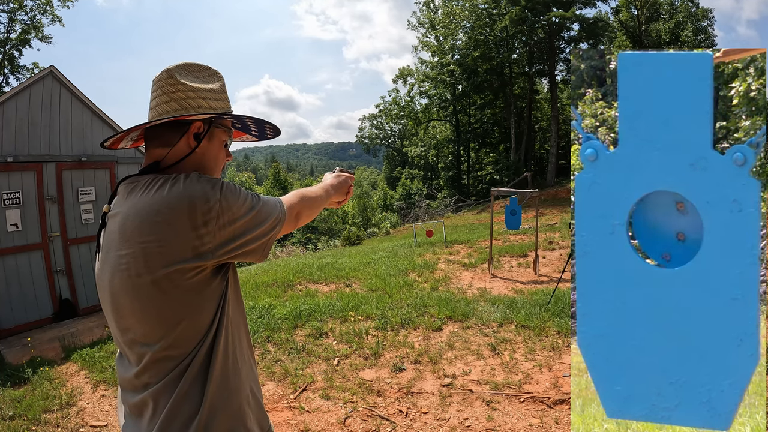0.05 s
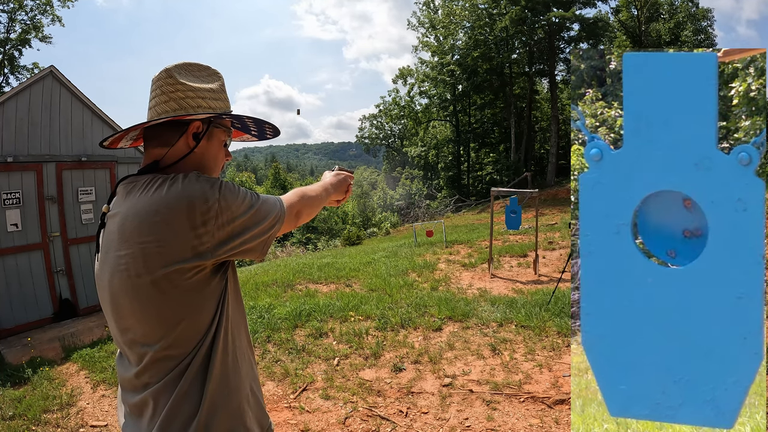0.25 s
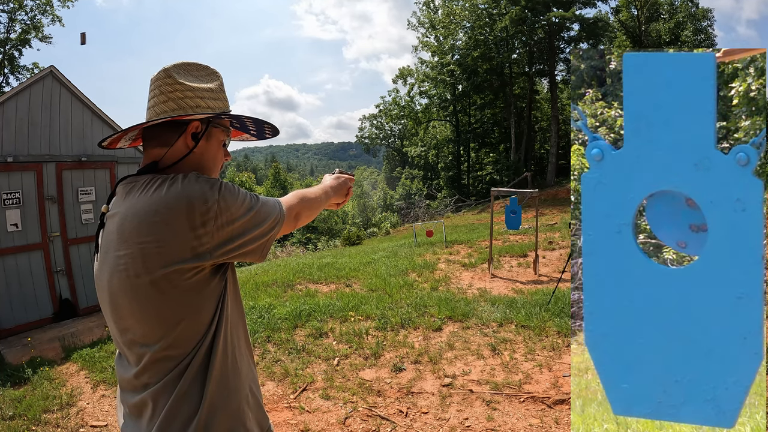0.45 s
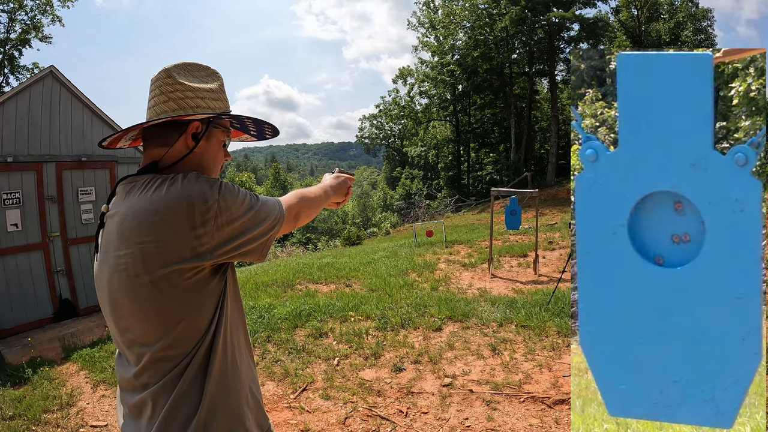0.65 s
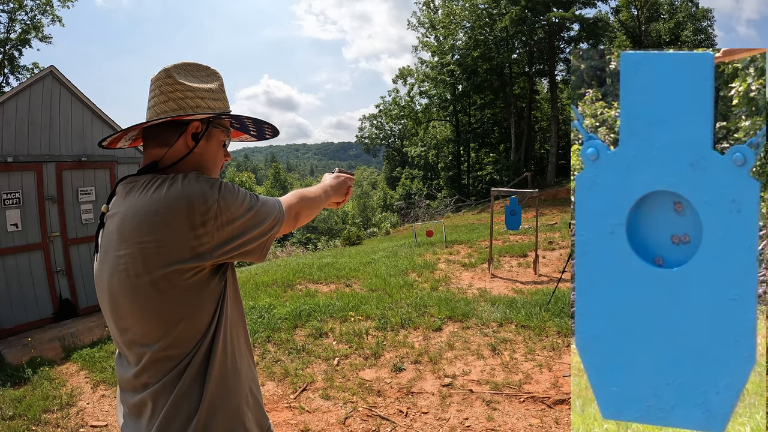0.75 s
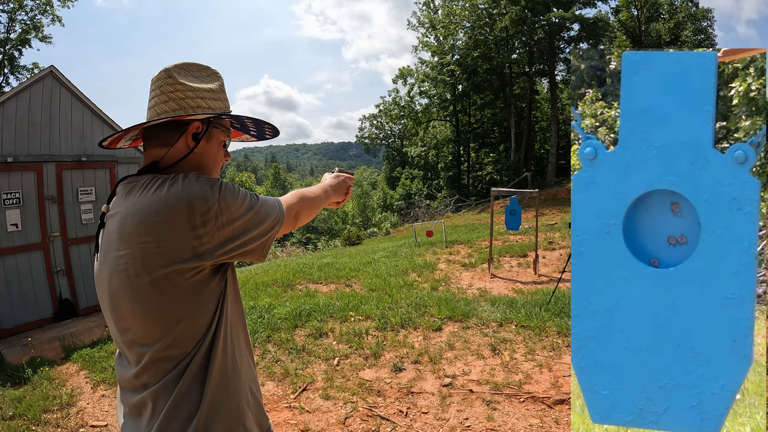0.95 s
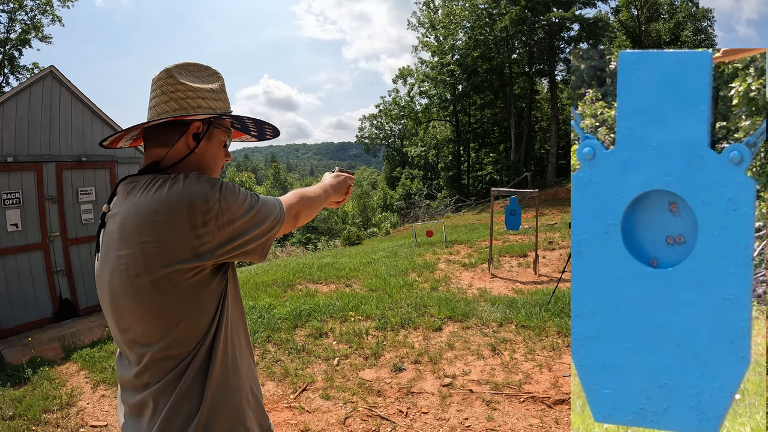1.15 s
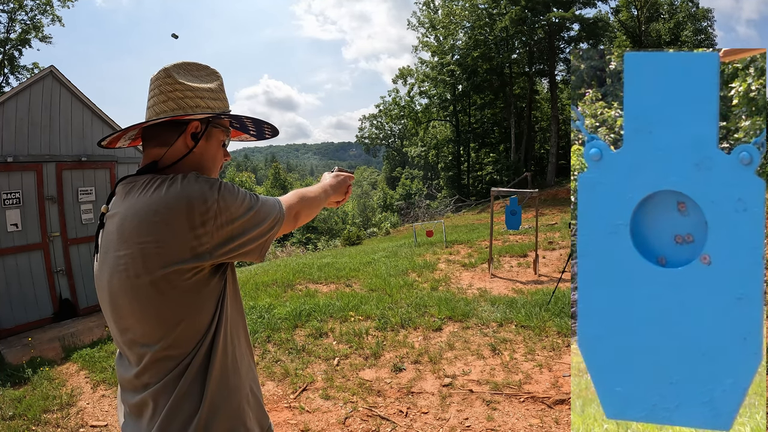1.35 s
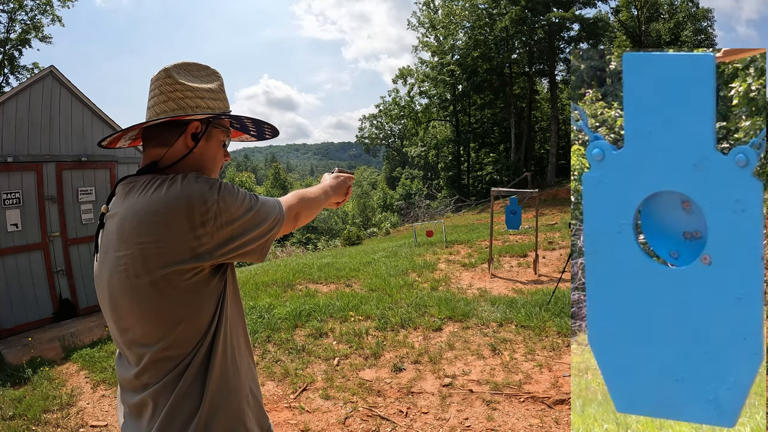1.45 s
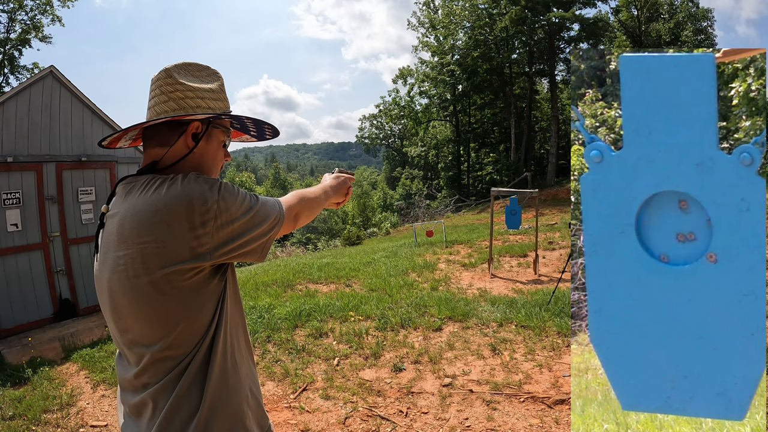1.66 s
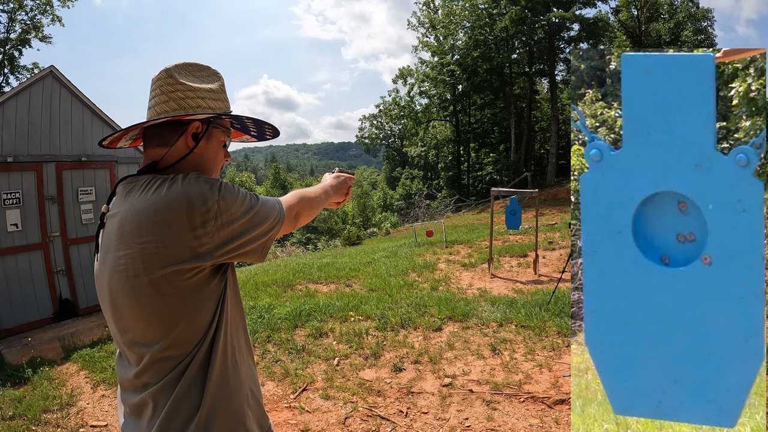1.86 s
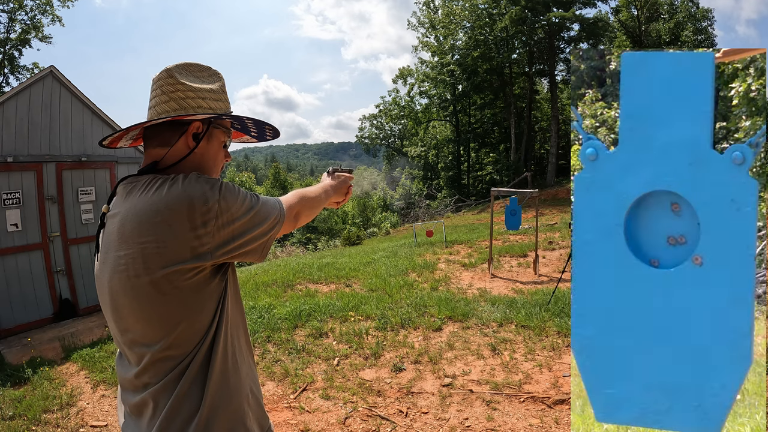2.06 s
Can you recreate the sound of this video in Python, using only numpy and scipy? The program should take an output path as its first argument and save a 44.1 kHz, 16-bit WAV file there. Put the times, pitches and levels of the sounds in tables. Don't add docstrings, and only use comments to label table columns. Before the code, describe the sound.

Pistol shots at a grassy range, nearly mono, close and distorted. An earlier shot's rumble and faint steel ring are fading at the start. At 0.21 s a hard crack and low boom, steel clang at 0.25, slapping echoes, then a metallic clack at 0.62. A second shot at 1.24, brighter clang at 1.27, clack at 1.71. Ringing and valley roll linger, with faint grit ticks and tiny thin chirps near 1.0 and 1.9.

```python
import sys
import numpy as np
from scipy import signal
from scipy.fft import rfft, irfft
from scipy.io import wavfile
from scipy.ndimage import uniform_filter1d

SR = 44100
rng = np.random.default_rng(int(sys.argv[2]) if len(sys.argv) > 2 else 0)


def dump(signal):
    limited = np.clip(np.atleast_2d(signal).T, -1, 1)
    pcm = np.round(limited * 32767).astype(np.int16)
    wavfile.write(sys.argv[1], SR, pcm)


def gain_from_db(level_db):
    decades = np.asarray(level_db, float) / 20
    return 10 ** decades


N = 92610

# (time [s], level [dB])
SHOTS = [
    (-0.85, 0),
    (0.2147, 0),
    (1.2351, 0),
]
FIRST_SHOT_S = 0.2147

# (frequency [Hz], level [dB per Hz])
VALLEY_COLOUR = [(30, -52), (130, -25.5), (420, -9), (720, 0.5), (1500, -15), (3200, -32), (5200, -31),
                 (9000, -49), (15000, -67)]
VALLEY_DB = -33.5

# (frequency [Hz], level [dB per Hz])
CRACK_COLOUR = [(500, -27), (1500, -4.5), (3300, -3.5), (4300, -2), (5600, -1.5), (7000, -6.5),
                (16000, -17.5)]
CRACK_DELAYS = [0, .0053, .0095, .0125, .0155, .0205, .0237, .0305]
CRACK_LEVELS = [3, 2, -10, -11, -10, -9, -12, -10]
CRACK_DB, CRACK_HOLD_S, CRACK_T60_S = -3.5, 0.0014, 0.009

# (frequency [Hz], level [dB per Hz])
BOOM_COLOUR = [(18, -31.5), (35, -17.5), (100, 1.5), (260, 2), (874, 3), (1680, -6), (3000, -34.5),
               (6600, -79)]
BOOM_DB, BOOM_RISE_S, BOOM_HOLD_S, BOOM_T60_S = -7.5, 0.0032, 0.026, 0.16

# (frequency [Hz], level [dB per Hz])
YARD_COLOUR = [(40, -24.5), (300, -16.5), (750, -17), (2500, -10.5), (5000, -11), (16000, -26.5)]
# (frequency [Hz], t60 [s])
YARD_DECAY = [(60, .4), (250, 0.94), (1000, 0.56), (4000, 0.34), (9000, 0.31), (16000, 0.22)]
YARD_DB, YARD_RISE_S = -14, 0.051

# (time [s], peak level [dB], pitch [Hz], length [cycles])
ECHOES = [(0.2164, 1, 418, 1.36), (.2205, -6.5, 545, 3.1), (0.2233, -6.5, 480, 2), (.226, -0.5, 230, 1.42),
          (.2308, -7.5, 670, 2.88), (.2365, -10, 490, 2.6), (.2435, -0.5, 547, 5.02),
          (0.325, -22, 340, 2.2), (0.329, -18, 1520, 2.9), (.3425, -22, 590, 2.1), (.347, -22, 700, 2),
          (.3588, -13.5, 1100, 2.1), (.36, -29.5, 172, 5.3), (0.3643, -13, 790, 1.8),
          (0.3735, -14, 790, 3.08), (.3843, -12.5, 658, 2.97), (.395, -16, 800, 2.7),
          (0.4065, -17, 580, 1.86), (.419, -24, 790, 2.6), (.436, -30, 884, 2.8), (.4435, -21.5, 600, 2.4),
          (.461, -22, 590, 2.65), (.472, -25, 607, 1.7), (.482, -34, 810, 2)]

# (frequency [Hz], level [dB], t60 [s])
THUMP = [(96, -12.5, .11), (148.2, -3.5, 0.1), (193, -8.5, 0.12), (254, -13.5, 0.1)]
THUMP_DELAY_S = 0.007

# (frequency [Hz], level [dB per Hz])
TREES_COLOUR = [(35, -62), (60, -24.5), (227, 7.5), (1950, -8.5), (3340, -16), (6000, -12.5), (9000, -20),
                (16000, -49.5)]
# (frequency [Hz], t60 [s])
TREES_DECAY = [(100, 0.37), (700, 0.54), (3000, 1.04), (5200, 1.19), (8000, 0.82), (16000, 0.58)]
TREES_DB, TREES_DELAY_S, TREES_RISE_S = -23, 0.12, 0.045

# (time [s], ring level [dB], rise [s], clatter level [dB], clatter t60 [s])
BLOWS = [
    (-.05, -37, .001, -49, 0.52),
    (.2515, -9, 0.0012, -12.5, 0.18),
    (1.2715, -4, 0.004, -14, 0.22),
    (0.6196, -15, 0.0012, -36, 0.11),
    (1.712, -13.5, 0.0011, -41.5, 0.28),
]
PLATE_HZ = [587, 1200, 1335, 1470, 2143, 2509, 2810, 3192, 4095, 4499, 4861, 5143, 5503]
PADDLE_HZ = [6230, 6725, 7002, 7267, 7440, 7880, 8254, 8597, 9234, 9512, 12320, 13340, 15550]
HANGER_HZ = [6072, 7685, 8511, 9740, 10600, 12522, 14735]
# (t60 [s], beat [Hz], depth [0-1])
PLATE_RING = [(0.24, 2.7, 0.3), (4.6, 1.1, 0.5), (0.76, 0.89, 0.1), (2.3, 1.2, .36), (1.79, 0.6, 0.09),
              (1.42, 1.5, 0.25), (0.82, 1.4, .36), (1.3, 2.3, 0), (0.87, 3.7, 0.3), (0.7, 5.5, 0.5),
              (1, 2.9, .8), (0.83, 0.54, .3), (0.72, 8.4, .5)]
# (t60 [s], beat [Hz], depth [0-1])
PADDLE_RING = [(0.57, 8, .5), (0.3, 7, .3), (0.44, 5.5, 0.29), (.8, 4, .4), (1.6, 4, .6), (0.55, 5, 0.27),
               (0.59, 3.5, .7), (.4, 6.6, .3), (0.26, 5, 0.58), (0.15, 7.1, .4), (0.25, 9.8, .4),
               (0.41, 4.4, .3), (0.13, 11, 0.35)]
# (t60 [s], beat [Hz], depth [0-1])
HANGER_RING = [(.5, 5, .4), (.6, 3, .4), (.3, 6, .3), (0.55, 3, .4), (.5, 4, .4), (.25, 7, 0.4),
               (.3, 5, 0.4)]
# (old ring [dB], bullet [dB], bullet [dB], clack [dB], clack [dB])
PLATE_DB = [(-26.5, -31.5, -20, -2, -6), (-2, -32.5, -29.5, -25, -31), (-2, -16, -22.5, -18.5, -16.5),
            (-21.5, -26.5, -26.5, -25, -33.5), (-6, -36, -22, -46, -29), (-3, -31, -27.5, -24, -23),
            (-26, -37, -33, -30, -42), (-39, -48.5, -52.5, -51, -35), (-15, -29, -31, -39, -30.5),
            (-3, -10, -11.5, -21.5, -34), (-14.5, -27, -18.5, -24, -40), (-28.5, -28, -13, -42, -37),
            (-35, -19, -12.5, -33, -40)]
# (old ring [dB], bullet [dB], bullet [dB], clack [dB], clack [dB])
PADDLE_DB = [(-16, -4, -10.5, -28, -32.5), (-19.5, -17.5, -14, -31, -46), (-37.5, -25.5, -4.5, -37, -38),
             (-24, -28, -20, -44, -39), (-40, -40, -19, -38.5, -43), (-40.5, -26.5, -14, -42, -38),
             (-29, 1, -40.5, -40, -35.5), (-24.5, -33, -14.5, -38, -60), (-45, -3.5, -31, -37, -53),
             (-41.5, -36, -8, -50, -50), (-43.5, -23, -32, -45, -50), (-35, -10, -18, -37, -37),
             (-60, -26, -27, -48, -48)]
# (old ring [dB], bullet [dB], bullet [dB], clack [dB], clack [dB])
HANGER_DB = [(-42, -32, -15, -45, -48), (-29, -35, -16.5, -48.5, -50), (-45, -35, -14, -55, -55),
             (-51, -36, -28.5, -48, -60), (-44, -31.5, -34, -48, -54), (-54, -37, -18, -55, -58),
             (-61, -39.5, -25, -58, -50)]
OLD_RING_LASTS = 1.36
STOP_S, STOP_DB = 0.095, -14
SWAY_HZ = [5, 9, 16]
SWAY_DB = 2.5

# (frequency [Hz], level [dB per Hz])
CLATTER_COLOUR = [(150, -39.5), (800, -1), (2500, -3.5), (4500, -4), (7000, -3), (10000, -13.5),
                  (15500, -26.5)]
SPLINTER_T60_S, SPLINTER_DB = 0.2, -5
CLACK_SPLINTER_DB = 6
DUCK_DB, RECOVER_S = -7.5, 0.35

# (time [s], level [dB], pitch
# [Hz])
TICKS = [(.3297, -27, 3500), (.3425, -33, 3000), (1.0, -58, 5000), (1.115, -62, 7500), (1.617, -62, 9000)]
# (time [s], length [s], level [dB], pitch [Hz], tremble [rad])
CHIRPS = [(1.015, 0.056, -73, 12300, 1.5), (1.205, .014, -69, 12200, 1.7), (.985, 0.047, -51, 4940, 1.3),
          (1.895, .04, -51.5, 5143, .8), (2.0, 0.089, -50.5, 5120, 0.34), (2.0, .025, -73, 11000, 3)]

AHEAD_DB, AHEAD_S = -16.5, 0.021
OVERLOAD, EDGE_HZ, SIDE_DB = 0.92, 15800, -36.5


def evened(x):
    return x / np.sqrt(np.mean(x ** 2) + 1e-20)


def read(points, hz):
    f, value = np.transpose(points)
    return np.interp(np.log(hz + 1), np.log(f + 1), value)


def add(mix, s, sound):
    at = round(s * SR)
    sound = sound[max(-at, 0):]
    part = mix[max(at, 0):][:len(sound)]
    part += sound[:len(part)]


def coloured(x, spectrum):
    gain = gain_from_db(read(spectrum, np.fft.rfftfreq(len(x), 1 / SR)))
    return evened(irfft(rfft(x) * gain, len(x)))


def dying(spectrum, t60, patchy_db):
    noise = coloured(rng.standard_normal(2 * SR), spectrum)
    hz, t, z = signal.stft(noise, SR, nperseg=512, noverlap=384)
    patches = uniform_filter1d(rng.standard_normal(z.shape), size=6, axis=0)
    patches = evened(uniform_filter1d(patches, size=5, axis=1))
    z = z * gain_from_db(patchy_db * patches - 60 * t / read(t60, hz)[:, None])
    return signal.istft(z, SR, nperseg=512, noverlap=384)[1][:2 * SR]


def valley():
    heights = gain_from_db(np.minimum(rng.exponential(1, N), 5))
    sparse = rng.random(N) < 3000 / SR
    lumps = evened(heights * rng.standard_normal(N) * sparse)
    low = 1 / (1 + (np.fft.rfftfreq(N, 1 / SR) / 1500) ** 4)
    hiss = rng.standard_normal(N)
    roll = irfft(rfft(lumps) * np.sqrt(low) + rfft(hiss) * np.sqrt(1 - low), N)
    swell = uniform_filter1d(rng.standard_normal(N), size=900)
    swell = evened(uniform_filter1d(swell, size=900))
    return gain_from_db(VALLEY_DB + 0.5 * swell) * coloured(roll, VALLEY_COLOUR)


def crack(level_db):
    t = np.arange(1024) / SR
    fall_db = 60 * np.maximum(t - CRACK_HOLD_S, 0) / CRACK_T60_S
    return gain_from_db(CRACK_DB + level_db - fall_db) * coloured(rng.standard_normal(1024), CRACK_COLOUR)


def boom():
    t = np.arange(8192) / SR
    fall_db = 60 * np.maximum(t - BOOM_HOLD_S, 0) / BOOM_T60_S
    swell = np.minimum(t / BOOM_RISE_S, 1)
    return swell * gain_from_db(BOOM_DB - fall_db) * coloured(rng.standard_normal(8192), BOOM_COLOUR)


def scatter(level_db, rise_s, colour, decay, patchy_db):
    t = np.arange(2 * SR) / SR
    return gain_from_db(level_db) * np.minimum(t / rise_s, 1) * dying(colour, decay, patchy_db)


def echo(db, hz, cycles):
    u = np.arange(2048) / SR * hz / cycles
    hump = np.sin(np.pi * np.minimum(u, 1)) ** 2
    return gain_from_db(db) * hump * np.sin(2 * np.pi * cycles * (u - 0.5))


def thump(hz, db, t60):
    t = np.arange(SR) / SR
    return gain_from_db(db - 60 * t / t60) * np.sin(2 * np.pi * hz * t)


def shot():
    out = scatter(YARD_DB, YARD_RISE_S, YARD_COLOUR, YARD_DECAY, patchy_db=4.5)
    for delay, db in zip(CRACK_DELAYS, CRACK_LEVELS):
        add(out, delay, crack(db))
    add(out, 0, boom())
    for s, *row in ECHOES:
        add(out, s - FIRST_SHOT_S, echo(*row))
    for row in THUMP:
        add(out, THUMP_DELAY_S, thump(*row))
    trees = scatter(TREES_DB, TREES_RISE_S, TREES_COLOUR, TREES_DECAY, patchy_db=0.95)
    add(out, TREES_DELAY_S, trees)
    return out


def sway(t, modes):
    drift = 0
    for rate in SWAY_HZ:
        own_rate = rate * (0.7 + 0.6 * rng.random((modes, 1)))
        drift = drift + np.sin(2 * np.pi * (own_rate * t[::64] + rng.random((modes, 1))))
    drift = drift.repeat(64, axis=1)[:, :len(t)]
    return SWAY_DB * drift * np.minimum(t / 0.1, 1)


def ring(t, blow, ring_db, lasts):
    hz = np.array(PLATE_HZ + PADDLE_HZ + HANGER_HZ)[:, None]
    db = np.array(PLATE_DB + PADDLE_DB + HANGER_DB)[:, blow, None]
    t60, beat_hz, depth = np.array(PLATE_RING + PADDLE_RING + HANGER_RING).T[:, :, None]
    pair = np.abs(1 + depth * np.exp(2j * np.pi * beat_hz * t)) / (1 + depth)
    flung = (hz > 4000) * (blow in (1, 2))
    db = db + STOP_DB * flung * (1 - np.exp(-(t / STOP_S) ** 2))
    db = db + sway(t, len(hz))
    level = gain_from_db(ring_db + db - 60 * t / (t60 * lasts))
    return (pair * level * np.sin(2 * np.pi * (hz * t + rng.random(hz.shape)))).sum(0)


def clatter(t, blow, level_db, t60):
    noise = coloured(rng.standard_normal(2 * SR), CLATTER_COLOUR)[:len(t)]
    noise = noise * gain_from_db(level_db - 60 * t / t60)
    place, size, life = rng.random((40, 3)).T[:, :, None]
    hz, u = 2500 + 13000 * place, t[:SR // 4]
    db = level_db + SPLINTER_DB + CLACK_SPLINTER_DB * (blow > 2)
    db = db + read(CLATTER_COLOUR, hz) - 12 * size
    db = db - 60 * u / (SPLINTER_T60_S * (0.5 + life))
    add(noise, 0, (gain_from_db(db) * np.sin(2 * np.pi * (hz * u + life))).sum(0))
    return noise


def steel(blow, start, ring_db, rise, clatter_db, clatter_t60):
    t = np.arange(min(N - round(start * SR), SR + SR // 4)) / SR
    lasts = OLD_RING_LASTS if start < 0 else 1
    struck = ring(t, blow, ring_db, lasts) + clatter(t, blow, clatter_db, clatter_t60)
    high_pass = signal.butter(2, 300, "high", fs=SR, output="sos")
    struck = signal.sosfilt(high_pass, struck * (1 - np.exp(-t / rise)))
    since = start + t - np.array([s for s, db in SHOTS])[:, None]
    duck_db = (DUCK_DB * np.exp(-abs(since) / RECOVER_S) * (since > 0)).sum(0)
    fade = np.minimum((t[-1] - t) / 0.053 + (start > 1), 1)
    return struck * gain_from_db(duck_db) * fade


def tick(db, hz):
    t = np.arange(600) / SR
    grain = coloured(rng.standard_normal(600), [(hz / 3, -30), (hz, 0), (hz * 2, -60)])
    return gain_from_db(db - 60 * t / 0.012) * grain * np.minimum(t / 0.001, 1)


def chirp(length, db, hz, tremble):
    t = np.arange(0, length, 1 / SR)
    wobble = tremble * np.sin(2 * np.pi * 60 * t)
    return gain_from_db(db) * np.sin(np.pi * t / length) * np.sin(2 * np.pi * hz * t + wobble)


def scene():
    mix, blast = valley(), shot()
    for s, db in SHOTS:
        add(mix, s, gain_from_db(db) * blast)
    for blow, row in enumerate(BLOWS):
        add(mix, row[0], steel(blow, *row))
    for s, *row in TICKS:
        add(mix, s, tick(*row))
    for s, *row in CHIRPS:
        add(mix, s, chirp(*row))
    return np.array([mix, mix])


def top_cut(x):
    return signal.sosfilt(signal.butter(12, 16700, fs=SR, output="sos"), x)


def record(dry):
    until = np.array([s for s, db in SHOTS])[:, None] - np.arange(N) / SR
    dip = np.clip(1 - until / AHEAD_S, 0, 1) ** 0.5 * (until > 0)
    dry = dry * gain_from_db((AHEAD_DB * dip).sum(0))
    x = OVERLOAD * dry / (1 + abs(dry) ** 6) ** (1 / 6)
    band_limit = signal.firwin(255, EDGE_HZ, window=("kaiser", 5), fs=SR)
    x = signal.oaconvolve(x, band_limit[None], "same")
    trace = gain_from_db(SIDE_DB) * np.roll(x[0] + np.gradient(x[0]), 300)
    return top_cut(x + np.array([trace, -trace]))


dry = scene()
out = record(dry)
dump(out)
```